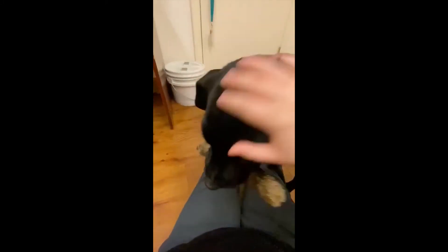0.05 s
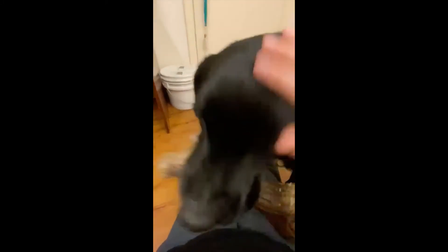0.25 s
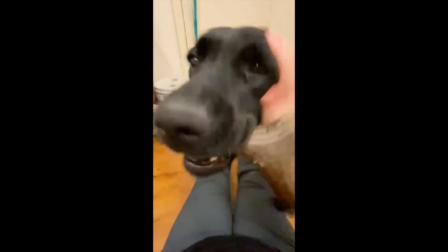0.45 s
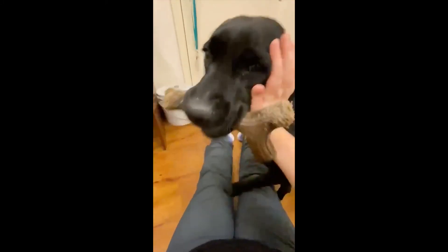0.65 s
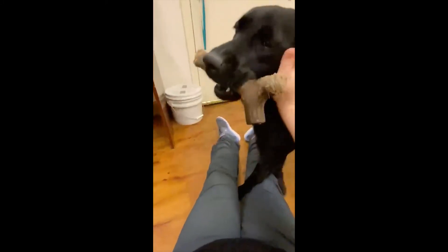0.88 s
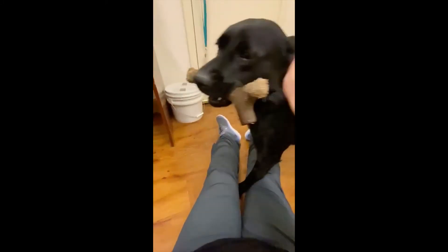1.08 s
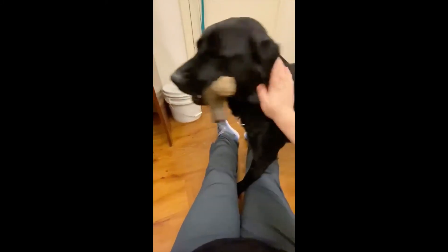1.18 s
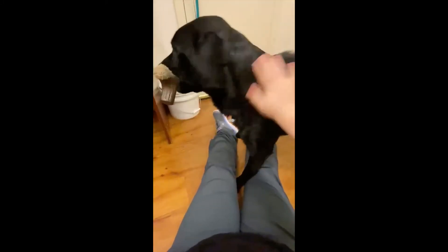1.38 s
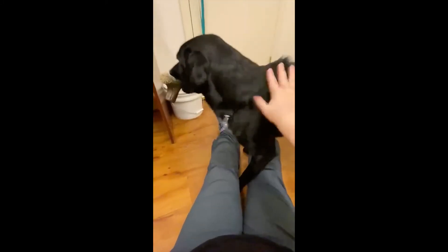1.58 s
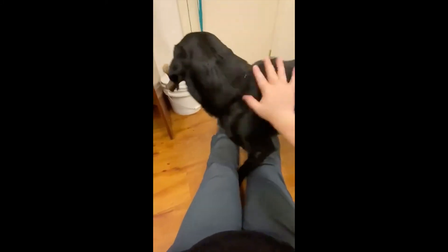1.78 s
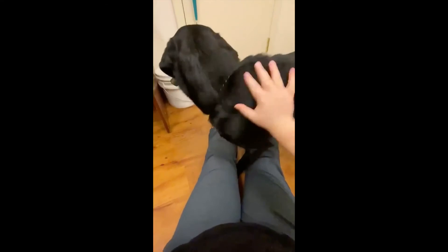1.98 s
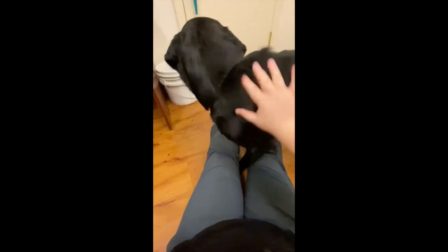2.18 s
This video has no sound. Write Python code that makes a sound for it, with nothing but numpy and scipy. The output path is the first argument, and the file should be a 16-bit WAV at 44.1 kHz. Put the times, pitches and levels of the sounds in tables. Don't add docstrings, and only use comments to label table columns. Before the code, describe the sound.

A hand rustles over a dog's short fur, with hollow bone knocks, in a quiet humming room

```python
import sys
import numpy as np
from scipy import signal
from scipy.fft import rfft, irfft
from scipy.io import wavfile
from scipy.ndimage import uniform_filter1d

SR = 44100
rng = np.random.default_rng(int(sys.argv[2]) if len(sys.argv) > 2 else 0)


def put_to_file(sound):
    columns = np.atleast_2d(sound).T
    safe = np.clip(columns, -1, 1)
    whole_steps = np.round(safe * 32767)
    wavfile.write(sys.argv[1], SR, whole_steps.astype(np.int16))


def invert_db(x):
    u = np.asarray(x, float) / 20
    return 10 ** u


N = 99225
T = np.arange(N) / SR

# time in seconds, peak in dB.
SNAPS = [(0.5395, -43), (1.151, -42), (1.3273, -45), (1.4124, -43.5), (1.473, -45.5), (1.4805, -44),
         (1.5482, -43), (1.5604, -38), (1.569, -46), (1.6466, -42), (1.6773, -38), (1.7525, -42.5),
         (1.8078, -49.5), (1.8585, -49.5), (1.8926, -49), (1.9668, -46.5), (1.496, -54), (1.58, -47)]
# time in seconds, turn of the right channel [0-1], gain in dB.
STEERING = [(0, 0.94, 12.5), (.2, 0.74, 3), (.28, 0.46, 3), (.45, 0, 0.5), (1.08, 0, 2.5),
            (1.11, 0.64, 7.5), (1.45, 0.77, 5.5), (1.78, 0.33, 1.5), (1.93, 0, -2.5), (2.25, 0.03, 2)]


def rms_one(x):
    return x / np.sqrt(np.mean(np.abs(x) ** 2) + 1e-20)


def in_time(rows):
    s, *columns = np.transpose(rows)
    return [np.interp(T, s, c) for c in columns]


def at_hz(points, hz):
    point_hz, value = np.array(points).T[:2]
    return np.interp(np.log(hz), np.log(point_hz), value)


def drift(rate_hz):
    r = np.exp(-80 * np.pi * rate_hz / SR)
    slow = signal.lfilter([1], [1, -2 * r, r * r], rng.standard_normal(N // 40 + 2002))[2000:]
    return np.interp(np.arange(N) / 40, np.arange(len(slow)), rms_one(slow))


def band(x, low_hz, high_hz):
    return signal.sosfilt(signal.butter(2, [low_hz, high_hz], "band", fs=SR, output="sos"), x)


def ring(x, hz, t60):
    r = invert_db(-60 / (t60 * SR))
    w = 2 * np.pi * hz / SR
    return signal.lfilter([0, np.sin(w)], [1, -2 * r * np.cos(w), r * r], x + 1e-18)


def analytic_noise():
    return signal.hilbert(rng.standard_normal(N))


def steered(z, hz):
    # frequency in Hz, phase in radians.
    full_turn = [(60, 3.5), (200, 4.2), (350, 2.38), (1000, 1.59)]
    share, gain_db = in_time(STEERING)
    turn = share * (at_hz(full_turn, hz) + 0.4 * drift(9.8))
    return invert_db(gain_db) * np.real([z, z * np.exp(1j * turn)])


def hair_noise():
    hairs_per_s, spread_db, share = 1900, -4.5, 0.67
    size = invert_db(spread_db * np.minimum(rng.exponential(1, N), 5))
    grains = size * rng.choice([-1, 1], N) * (rng.random(N) < hairs_per_s / SR)
    white = rng.standard_normal((2, 2, N))
    white[:, 0] = rms_one(share * rms_one(grains) + (1 - share) * white[:, 0])
    return white


def squeaks(white):
    # peak in seconds, half length in seconds, level in dB, centre in Hz, width in Hz.
    tufts = [(.22, 0.02, -67, 5300, 696), (.535, 0.01, -49, 5580, 895), (.63, 0.044, -60, 5800, 1000),
             (.72, 0.0069, -52.5, 2470, 490), (.72, 0.014, -62.5, 5600, 500),
             (.756, 0.0071, -61, 4000, 696), (.757, 0.0061, -56.5, 5540, 800),
             (.82, 0.049, -62.5, 5640, 880), (1.3, 0.011, -62.5, 2180, 600),
             (1.335, 0.0091, -71, 4600, 800), (1.4, 0.01, -80, 4660, 900), (1.575, 0.041, -61.5, 5600, 805),
             (1.57, 0.031, -70.5, 4250, 595), (1.6475, .002, -59.5, 5300, 2970),
             (1.755, 0.0034, -68, 4060, 1200), (.541, 0.0012, -51.5, 5130, 2000),
             (.7115, 0.0012, -78, 2230, 1410), (.2415, 0.0031, -55, 2000, 2400),
             (1.685, 0.0061, -57, 9450, 700), (2.065, 0.013, -59.5, 2070, 600),
             (2.085, 0.03, -68.5, 4200, 800), (2.02, 0.062, -68.5, 5530, 800),
             (2.165, 0.0099, -59, 1900, 600), (2.2, 0.024, -70, 5460, 800)]
    total = 0
    for k, (s, half_s, db, hz, width_hz) in enumerate(tufts):
        squeak = rms_one(band(white[k % 2, 0], hz - width_hz / 2, hz + width_hz / 2))
        total = total + invert_db(db) * np.exp(-((T - s) / half_s) ** 2) * squeak
    return total


def right_port_delay(x):
    lag_s, fixed_turn, from_hz = .000167, -1.67, 2170
    hz = np.arange(N // 2 + 1) * SR / N
    share = np.clip(hz / from_hz - .5, 0, 1)
    return irfft(rfft(x) * np.exp(-1j * share * (2 * np.pi * hz * lag_s - fixed_turn)), N)


def fur():
    # peak, rise and fall in seconds, level in dB, tilt in dB per octave.
    strokes = [(.005, 0.035, 0.024, -63, -2), (.11, 0.023, 0.037, -69, 7.5), (.225, 0.0063, 0.045, -82, 2),
               (0.277, 0.033, 0.039, -63, 1), (0.494, 0.038, 0.024, -67, 3.5),
               (0.536, 0.025, 0.0086, -50.5, -0.9), (0.619, 0.075, 0.069, -57.5, -1.5),
               (0.748, 0.059, 0.043, -65, -7), (0.831, 0.064, 0.08, -66.5, -0.5),
               (1.153, 0.014, 0.0082, -73.5, 11), (1.299, 0.017, 0.027, -88.5, -11.5),
               (1.334, 0.018, 0.021, -58, 0.), (1.39, 0.022, 0.033, -63.5, -1.5),
               (2.083, 0.024, 0.026, -57.5, 0), (2.168, 0.014, 0.03, -64.5, -2.5)]
    scratches = [(1.486, 0.015, 0.019, -67, 4.5), (1.568, 0.021, 0.04, -57.5, 2.5),
                 (1.648, 0.0061, 0.021, -62, 1.5), (1.68, 0.008, 0.016, -58, 2.5),
                 (1.756, 0.045, 0.061, -63.5, -1), (1.811, 0.0071, 0.0047, -73, 6),
                 (1.9, 0.025, 0.012, -59, 3), (1.97, 0.021, 0.04, -69, -2.5)]
    # time in seconds, level in dB.
    resting = [(0, -68.5), (.4, -74.5), (.6, -69.5), (.97, -73.5), (1.1, -67.5), (1.4, -63.5), (1.7, -74),
               (1.85, -75), (2.25, -60.5)]
    # frequency in Hz, level in dB per Hz.
    fur_colour = [(700, -2), (1500, -5.5), (3000, -3.5), (5600, -1.5), (7500, -1), (10000, -3.5),
                  (13000, -1), (15500, -2.5)]
    # frequency in Hz, level in dB.
    fur_pan = [(700, 0.1), (2000, 2), (4500, 1), (8000, .1), (15000, .3)]
    # frequency in Hz, left-right likeness [0-1].
    likeness = [(700, 0.59), (2500, 0.033), (4500, 0.067), (7000, 0.78), (15000, 0.76)]
    rest_tilt_db = -4
    snap_gain_db, snap_decay_s, snap_colour_db = -6, 0.0022, 2.5
    head_hz, head_octaves, head_gain_db, head_until_s = 5600, 0.17, 9, 1

    rest_db, = in_time(resting)
    rows = np.array(strokes + scratches)
    shapes = np.array([np.exp(-((T - s) / np.where(T < s, rise, fall)) ** 2) for s, rise, fall in rows[:, :3]])
    white = hair_noise()
    snap_s, snap_db = np.transpose(SNAPS)
    after = T - snap_s[:, None]
    snaps = (after > 0) * np.exp(-np.abs(after) / snap_decay_s) * rng.standard_normal(N)
    snap_colour = rng.standard_normal((len(SNAPS), 18))

    out, scale, flutter = 0, 0, drift(62)
    edges = np.geomspace(600, 16500, num=19)
    for k, (low, high) in enumerate(zip(edges, edges[1:])):
        hz = np.sqrt(low * high)
        octave = np.log2(hz / 6000)
        alike = np.clip(at_hz(likeness, hz), 0, 1)
        head_db = head_gain_db * np.exp(-(np.log2(hz / head_hz) / head_octaves) ** 2)
        stroke_db = rows[:, 3] + rows[:, 4] * octave + head_db * (rows[:, 0] < head_until_s)
        level = invert_db(stroke_db) @ shapes + invert_db(rest_db + rest_tilt_db * octave)
        level *= invert_db(0.5 * flutter + 1.96 * drift(15) + 0.5 * drift(50))
        near, own = band(white[k % 2] * level, low, high)
        crackle = invert_db(snap_db + snap_gain_db + snap_colour_db * snap_colour[:, k]) @ snaps
        near = near + invert_db(9 * min(octave + .6, 0)) * band(crackle, low, high)
        right = invert_db(at_hz(fur_pan, hz)) * (alike * near + np.sqrt(1 - alike ** 2) * own)
        colour = invert_db(at_hz(fur_colour, hz)) * (-1) ** k
        out = out + colour * np.array([near, right])
        scale += colour ** 2 * (high - low) * 2 / SR
    out = out / np.sqrt(scale) + squeaks(white)
    out[1] = right_port_delay(out[1])
    return out


def knocks():
    # time in seconds, peak in dB, pitch in Hz, t60 in seconds, crackle in dB.
    bone_knocks = [
        (.241, -18, 520.6, 0.08, -45),
        (.541, -31, 723, 0.025, -40),
        (0.543, -35.5, 412, 0.03, -17),
        (.7115, -20.5, 618.7, 0.029, -29),
        (.724, -34.5, 600, 0.11, -17),
        (0.729, -29, 646, 0.067, -23),
        (.752, -35, 688, 0.05, -22),
        (.764, -30, 494, 0.0075, -18),
        (.866, -38, 640, 0.024, -38),
    ]
    paw_thump = (.748, -39., 70., .19, -50.)
    # ratio to the pitch, level in dB.
    other_modes = [(0.746, -13.5), (0.44, -17), (1.194, -20)]
    contact_share, grip_share = 0.058, 0.35
    lag_s, pan_db = 0.00032, -1.07
    tail_db, tail_t60_share, tail_rough = -31.5, 2.1, 0.61
    tail_hold = 11.3

    out = np.zeros((2, N))
    for s, db, hz, t60, crackle_db in bone_knocks + [paw_thump]:
        contact_s = contact_share * t60 + 0.002
        burst = rng.standard_normal(N) * (T > s) * np.exp(-np.abs(T - s) / .003)
        crackle = band(burst, 1500, 3000) * 3
        for side in (0, 1):
            after = T - s + side * lag_s
            push = np.sin(np.pi * np.clip(after / contact_s, 0, 1)) ** 2 * 4 / (contact_s * SR)
            body = 0
            for ratio, mode_db in [(0.97, 0.0065)] + other_modes:
                mode_hz = hz * ratio
                body = body + invert_db(mode_db) * ring(push * np.cos(2 * np.pi * mode_hz * after), mode_hz, t60)
            body = body * np.exp(-(after / (grip_share * t60)) ** 4)
            out[side] += invert_db(db + pan_db * (0.5 - 2 * side)) * (body + invert_db(crackle_db) * crackle)
        after = np.maximum(T - s - 2 * contact_s, 0)
        phase = 2 * np.pi * hz * 0.98 * T + tail_rough * np.array([drift(46), drift(27)])
        tail = np.sqrt(2) * np.sin(phase) * invert_db(2.6 * drift(45))
        fall_db = 60 * np.maximum(after - tail_hold * t60 ** 2, 0) / (tail_t60_share * t60)
        out += invert_db(db + tail_db - fall_db) * (1 - np.exp(-after / 0.0025)) * tail
    return out


def rub():
    # time in seconds, level in dB, centre in Hz.
    rubbing = [(0, -73.5, 450.), (.3, -56, 450.), (.45, -78, 400), (.54, -53, 500), (.61, -57.5, 400),
               (.66, -57.5, 420), (.8, -59, 420), (.92, -70, 350), (1.05, -75, 443), (1.12, -62.5, 444.4),
               (1.28, -59.5, 507), (1.4, -59, 470), (1.55, -58, 420), (1.74, -56.5, 390.),
               (1.82, -77.5, 400.), (2.05, -60, 400.), (2.25, -63.5, 456)]
    width_hz = 164
    db, centre_hz = in_time(rubbing)
    low_pass = signal.butter(2, width_hz / 2, fs=SR, output="sos")
    base = signal.sosfilt(low_pass, rng.standard_normal((2, N)))
    z = rms_one(base[0] + 1j * base[1]) * np.exp(2j * np.pi * np.cumsum(centre_hz) / SR)
    return steered(invert_db(db + 3 + drift(12)) * z, 1000)


def room_air():
    # frequency in Hz, level in dB per Hz.
    room_colour = [(18, -45), (30, -14), (97, 4), (121, -10.5), (194, -3.5), (292, -5.5), (501, -11.5),
                   (695, -19), (1500, -39), (1950, -61), (3300, -120)]
    gust_colour = [(30, -34), (60, 27.5), (95, 7), (140, 19), (200, -40), (300, -42), (500, -40),
                   (800, -80)]
    room_db, gust_db, diffuse_db, rumble_db = -54, -41.5, -3.5, -77.5
    opposite = np.array([[1], [-1]])
    white = [analytic_noise(), analytic_noise()]
    other = rng.standard_normal((2, 2, N))
    room, gust = 0, 0
    edges = np.geomspace(36, 1600, num=13)
    for k, (low, high) in enumerate(zip(edges, edges[1:])):
        hz = np.sqrt(low * high)
        diffuse, air = band(other[k % 2], low, high)
        tone = steered(band(white[k % 2], low, high), hz)
        tone = tone + invert_db(diffuse_db) * min(hz / 300, 1) * diffuse * opposite
        room = room + invert_db(at_hz(room_colour, hz) + 1.5 * drift(5)) * tone
        gust = gust + invert_db(at_hz(gust_colour, hz) + 2.5 * drift(15)) * air
    turn_share = in_time(STEERING)[0]
    rumble = invert_db(rumble_db) * rms_one(band(other[0, 0], 10, 55))
    return invert_db(room_db) * rms_one(room) + invert_db(gust_db) * turn_share * rms_one(gust) * opposite + rumble


def appliance_hum():
    # centre in Hz, width in Hz, level in dB.
    hum_bands = [
        (252.6, 38, -61.5),
        (291.2, 7, -61.5),
        (400, 19.7, -70),
    ]
    # time in seconds, level in dB.
    mains_level = [(0.0, -53.5), (0.07, -117), (0.09, -62), (0.16, -89), (0.21, -55.5), (0.25, -62),
                   (0.32, -54), (1.11, -54.5), (1.21, -68), (1.25, -60.5), (1.32, -72), (1.36, -56.5),
                   (1.38, -48.5), (1.42, -86), (1.45, -59.5), (1.75, -62.5), (1.82, -53), (2.25, -55)]
    mains_hz, phase_rough = 100.6, 0.56
    out = invert_db(in_time(mains_level)[0] + 5) * np.sin(2 * np.pi * mains_hz * T + phase_rough * drift(28.6))
    for hz, width_hz, db in hum_bands:
        noise = rms_one(band(analytic_noise(), hz - width_hz / 2, hz + width_hz / 2))
        out = out + steered(invert_db(db) * noise, hz)
    return out


def scene():
    return fur() + knocks() + rub() + room_air() + appliance_hum()


def dips(x, table):
    hz = np.arange(N // 2 + 1) * SR / N
    db = 0
    for low_hz, high_hz, cut_db in table:
        db = db + cut_db * np.exp(-((2 * hz - low_hz - high_hz) / (high_hz - low_hz)) ** 8)
    return irfft(rfft(x) * invert_db(db), N)


def roll_off(x):
    return signal.sosfilt(signal.butter(12, 17040, fs=SR, output="sos"), x)


def record(dry):
    # low edge in Hz, high edge in Hz, cut in dB.
    mid_nulls = [(6850., 8150., -26.), (12500., 14500., -26.)]
    side_nulls = [(9700., 11600., -26.), (15000., 17500., -14.)]
    null_opens_s, duck_share = .009, 0.72
    mid, side = (dry[0] + dry[1]) / 2, (dry[0] - dry[1]) / 2
    from_snap_s = np.min([np.abs(T - s - .004) for s, db in SNAPS if db > -52.5], axis=0)
    shut = 1 - 0.97 * uniform_filter1d(1. * (from_snap_s < null_opens_s), size=300)
    low = signal.sosfiltfilt(signal.butter(2, [144, 247], "band", fs=SR, output="sos"), mid)
    mid = mid - np.clip(duck_share * in_time(STEERING)[0], 0, 1) * low
    mid = mid + shut * (dips(mid, mid_nulls) - mid)
    side = side + shut * (dips(side, side_nulls) - side)
    cut = signal.sosfilt(signal.cheby2(12, 60, 16100, fs=SR, output="sos"), [mid + side, mid - side])
    cut = signal.sosfilt(signal.butter(4, 30.6, "high", fs=SR, output="sos"), cut)
    return roll_off(cut)


dry = scene()
out = record(dry)
put_to_file(out)
```